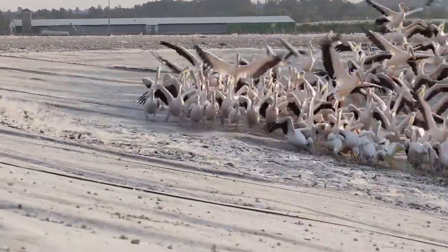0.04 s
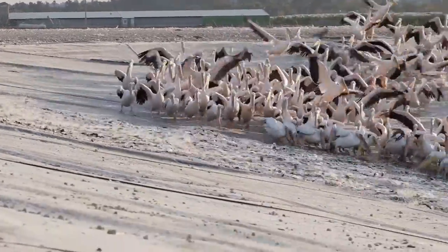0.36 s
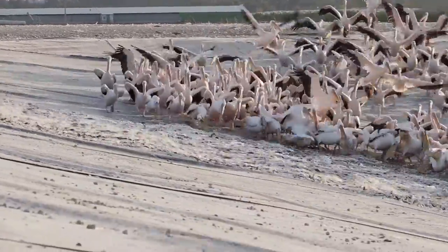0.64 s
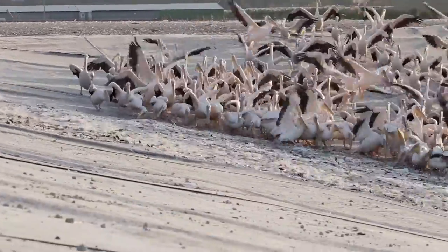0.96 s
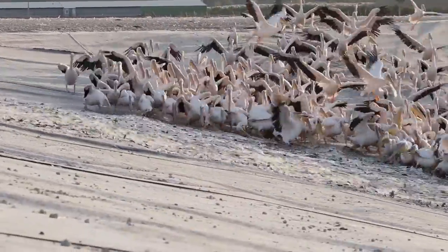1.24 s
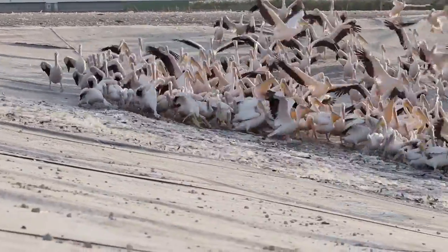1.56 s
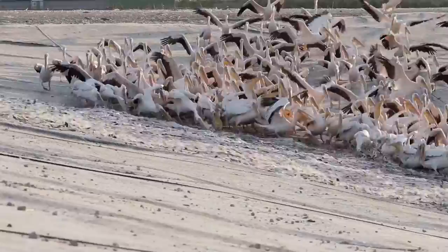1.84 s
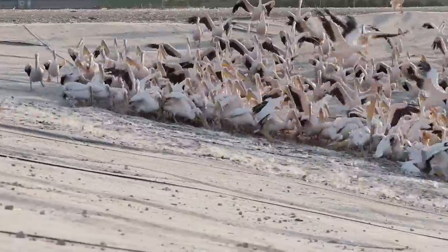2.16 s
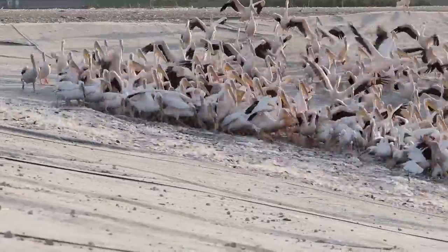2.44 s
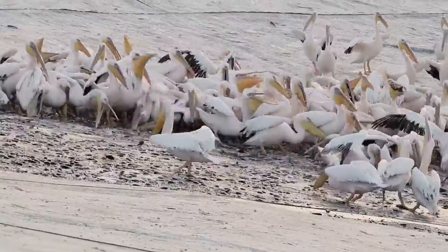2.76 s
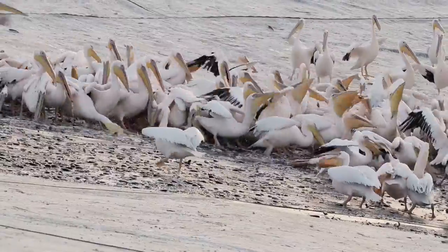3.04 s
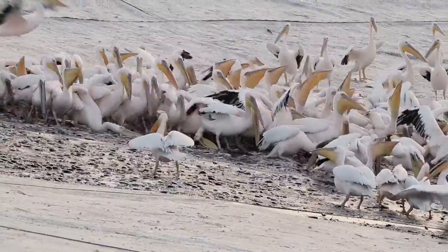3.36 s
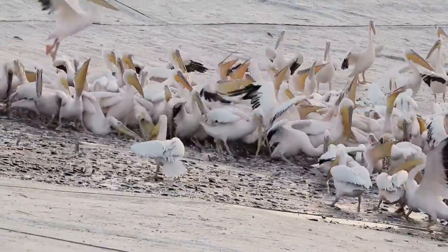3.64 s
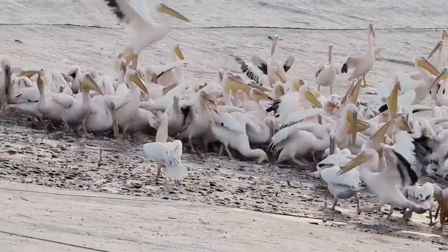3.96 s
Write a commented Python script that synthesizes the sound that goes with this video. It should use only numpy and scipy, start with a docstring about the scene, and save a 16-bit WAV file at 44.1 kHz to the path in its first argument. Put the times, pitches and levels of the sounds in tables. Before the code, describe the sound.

A large flock of pelicans churns shallow water into a dense, splashing rush outdoors, mostly to the right. Nearer wing thumps, spurts of spray and sharp claps stand out, with the loudest clap near 0.85 seconds. At about 2.6 seconds the rush drops abruptly to quieter sloshing, with small splashes, bill snaps and a few wingbeats until 4 seconds. Faint bubbling runs throughout, and there is little bass.

```python
"""Pelicans churning the shallows

A large flock crowds a reservoir bank, mostly to the right. Countless wings and feet churn
the water into a rush; nearer birds stand out with wing thumps, sharp claps and spurts of spray.
The rush gives way abruptly to a quieter group that jostles, sloshes and snaps its bills.
Bubbles ring throughout, and the microphone has a steep low cut."""
import sys
import numpy as np
from scipy import signal
from scipy.fft import rfft, irfft
from scipy.io import wavfile

SR = 44100
rng = np.random.default_rng(int(sys.argv[2]) if len(sys.argv) > 2 else 0)


def store_pcm(level_fs):
    """Save levels as 16-bit WAV."""
    pcm = np.round(np.clip(level_fs, -1, 1) * 32767).astype(np.int16)
    wavfile.write(sys.argv[1], SR, np.atleast_2d(pcm).T)


N = 176400
T = np.arange(N) / SR
HZ = np.maximum(np.arange(N // 2 + 1) * SR / N, 1)

# Levels are relative, ahead of each layer's trim. Pan is left minus right.
# fader ride of the far wingbeats: t/s, level/dB
FAR_WING_RIDE = [(0, -39), (.35, -40.5), (.8, -46.5), (1.1, -41.5), (1.4, -47.5), (1.9, -42.5),
                 (2.2, -45.5), (2.5, -55), (2.7, -54.5), (3.4, -55.5), (3.6, -52), (4, -48.5)]
# their tone: f/Hz, level/dB
FAR_WING_EQ = [(100, 7), (220, 3), (350, 2), (550, 1.5), (900, -40), (2500, -73)]
# their placement: f/Hz, pan/dB
FAR_WING_PAN = [(200, -8), (400, -2.5), (700, 1)]
# trapped bubbles: t/s, level/dB, f/Hz, pan/dB
PLOPS = [(.375, -15, 837, -16), (2.859, -26, 790, 12), (3.207, -27, 4100, -4), (3.292, -23, 1340, 1)]
# single splashes in the quieter group: t/s, level/dB, decay/s, f/Hz, pan/dB
SPLASHES = [(2.608, -32.5, 0.019, 1700, -9), (2.738, -33, 0.025, 2100, -5), (2.847, -28, 0.046, 1620, -11),
            (2.858, -38.5, 0.04, 800, 16), (2.885, -33, 0.016, 1710, -13), (2.931, -29.5, 0.019, 2160, 2),
            (3.199, -25.5, 0.022, 2550, -12), (3.227, -29, .02, 2040, -1), (3.393, -31, 0.053, 2100, -2),
            (3.533, -27.5, 0.013, 1680, -4), (3.566, -27.5, 0.015, 1790, -8), (3.788, -31, 0.037, 1740, -2),
            (3.835, -32, 0.062, 2480, -6), (3.924, -31.5, 0.025, 2020, -3)]
# spurts of spray: t/s, level/dB, decay/s, f/Hz, pan/dB
SPRAYS = [(.15, -23, 0.005, 7740, -3), (0.193, -24.5, .0076, 7900, -17), (0.7775, -19.5, 0.011, 7500, -10),
          (0.808, -24, 0.0092, 7000, -14), (1.296, -15, .0034, 6600, -7), (1.518, -22, 0.013, 7640, -6),
          (1.654, -18, 0.0063, 8200, -3), (1.963, -18, 0.0053, 3980, -5), (2.934, -30, .0048, 4800, 0),
          (3.303, -26, .003, 11500, -8), (3.3951, -32, .0027, 7000, 4), (3.6382, -29, .004, 4200, -4),
          (3.6817, -30.5, .004, 6500, -3), (3.7406, -32, .0045, 9500, -10), (3.806, -28.5, .0027, 6470, 1)]
# near wing thumps: t/s, level/dB, f/Hz, rise/cycles, pan/dB
DOWNSTROKES = [(0.097, -10, 460, 1.25, -34), (0.1632, -19, 400, 0.98, -29), (0.212, -20.5, 360, 1.2, -21),
               (.2674, -14, 560, 0.95, -9), (0.3145, -11.5, 446, 0.34, -21),
               (0.3601, -15.5, 474, 0.82, -23), (.374, -18.5, 318, 1.9, -33), (0.388, -12.5, 400, .8, -21),
               (0.406, -17.5, 436, .6, -25), (0.4778, -8, 543, 0.55, -27), (0.6182, -22.5, 380, 0.86, -19),
               (.655, -17.5, 740, 1.3, -18), (1.05, -23.5, 297, .8, -4), (1.095, -22, 284, 0.97, -6),
               (1.16, -23, 266, 0.95, -7), (1.5455, -8.5, 690, 1.45, 1.5), (1.5997, -10, 560, 0.57, -12),
               (1.601, -12.5, 260, 0.63, -25), (1.6768, -16, 450, .7, -22), (1.864, -20, 444, 0.42, -25),
               (2.0124, -20, 450, 1.1, -32), (2.1495, -18, 327, 0.52, -34), (2.2425, -16, 800, 1.3, -8),
               (3.088, -11.5, 202, 0.64, -14), (3.0914, -28, 394, 1, -12), (3.2177, -24.5, 335, 0.65, 11),
               (3.555, -25, 305, 0.48, -9), (3.5796, -30, 273, 1.5, -7), (3.7983, -29.5, 300, 0.98, -4)]
# papery tone of feathers: f/Hz, level/dB
FEATHER_EQ = [(200, -7), (450, -4.5), (900, 9.5), (1500, -8), (3000, -9), (8000, -41)]
# bills snapping and wings slapping water: t/s, level/dB, f/Hz, pan/dB
CLAPS = [(.147, -11, 1300, -6), (.2532, -11, 1600, -9), (.2934, -5, 1750, -8), (.4272, -15, 1500, -6),
         (.4858, -11, 1950, -9), (.4953, -13, 1950, -8), (.5089, -13, 1500, -14), (.8062, -14, 1600, -6),
         (.8505, 1.5, 1170, -4), (.8652, -13, 1000, -4), (.9855, -9.5, 2350, -6), (1.5452, -10, 1100, -2),
         (1.585, -12, 1300, -6), (1.7016, -12, 1350, -7), (1.848, -10, 2000, -7), (1.8837, -9, 1450, -6),
         (1.9297, -3, 1600, -12), (2.0171, -11, 1200, -2), (2.1398, -14, 1500, -10),
         (2.2421, -10, 1200, -5), (2.423, -12, 1200, -4), (2.5394, -10.5, 1250, -6),
         (2.8483, -21.5, 2100, -2), (2.8586, -17, 1850, -10), (2.8936, -23, 1850, -11),
         (2.934, -20, 1260, 0), (2.9385, -18, 2200, 3), (2.9632, -19, 2750, 0), (3.0416, -15, 2100, 0),
         (3.1987, -23, 2300, -11), (3.2368, -13, 2400, -1), (3.269, -23, 2000, -3), (3.855, -23, 2300, -5),
         (3.3947, -19, 2050, 0), (3.4187, -24, 2400, -4), (3.5402, -27, 1550, 0), (3.8045, -14, 1550, 0)]
# body, mid and treble bands of the water: low/Hz, high/Hz
WATER_BANDS = [(250, 1000), (1000, 4500), (4500, 15800)]
# fader rides of the flock's rush and the quieter slosh: t/s, body/dB, mid/dB, treble/dB
RUSH_RIDE = [(0, -62, -31, -43), (.03, -39.5, -31, -38.5), (.27, -41.5, -29.5, -38.5),
             (.4, -43, -32.5, -40), (.76, -38.5, -29, -39), (.82, -36, -27, -40), (.88, -38.5, -30.5, -40),
             (1.2, -37, -29.5, -37), (1.35, -34, -28.5, -37), (1.53, -35, -27, -37),
             (1.58, -38, -30.5, -39), (1.85, -38, -27.5, -36.5), (2.05, -39, -30, -39),
             (2.3, -37, -28, -38), (2.54, -37, -29.5, -38)]
SLOSH_RIDE = [(2.6, -51.5, -42.5, -47), (2.7, -53.5, -43.5, -47.5), (2.95, -55.5, -40.5, -47.5),
              (3.13, -56, -45, -49.5), (3.32, -58, -42, -46.5), (3.5, -56, -44, -49),
              (3.7, -57.5, -43, -48.5), (3.85, -56, -43, -47.5), (4, -56.5, -41.5, -47.5)]
# their tone: f/Hz, level/dB
RUSH_EQ = [(240, -59), (400, -17.5), (527, -15), (643, -7), (705, -6.5), (738, -4), (1050, -4), (1280, 1.5),
           (1740, -3.5), (2430, -3.5), (2790, -8), (3510, -9), (5000, -17), (7910, -17), (11900, -24.5),
           (15500, -34)]
SLOSH_EQ = [(240, -35), (400, -25), (552, -16), (595, -7), (784, -13), (834, -14), (900, -7.5),
            (1380, -4.5), (2320, -2), (4090, -6), (5000, -16.5), (6580, -13), (8530, -16.5), (12500, -25),
            (15500, -34)]
# their placement: f/Hz, pan/dB
RUSH_PAN = [(400, -0.5), (720, 5.5), (950, -6), (1250, -6), (1600, -2), (2000, -11.5), (3300, -7),
            (5000, -8), (7500, -4), (14000, -8)]
SLOSH_PAN = [(400, 7), (700, 8.5), (1290, 0.5), (2380, -7), (4400, -7), (8100, -5), (15000, -4.5)]
# stereo image of the patter: f/Hz, power share common to both sides (0 wide, 1 mono)
MONO_SHARE = [(200, 0.63), (450, 0.9), (750, 0.39), (1050, 0), (1300, 0.28), (1650, 0.78), (2400, 0.41),
              (3100, 0.24), (4500, 0.3), (5800, 0.01), (9000, 0.05)]

CHANGE_S, CROSSFADE_S = 2.566, 0.0055   # the rush gives way to the slosh
FLOCK_LAG_S, SLOSH_LAG_S = 0.00027, 0.00016   # the left side hears the birds later


def from_db(db):
    """Decibels to gain."""
    return 10 ** (np.asarray(db) / 20)


def rms_one(x):
    """Scale to unit rms."""
    return x / np.sqrt(np.mean(x ** 2) + 1e-20)


def in_time(rows):
    """Each fader of a ride at every sample."""
    times, *columns = np.transpose(rows)
    return [np.interp(T, times, column) for column in columns]


def at_hz(points):
    """A curve at every frequency."""
    hz, value = np.transpose(points)
    return np.interp(np.log(HZ), np.log(hz), value)


def eq(x, gain):
    """Filter by a gain per frequency."""
    return irfft(rfft(x) * gain, N)


def drift(corner_hz):
    """A smooth random wobble of unit rms."""
    return rms_one(eq(rng.standard_normal(N), 1 / (1 + (HZ / corner_hz) ** 2)))


def panned(pan_db):
    """Constant-power left and right gains."""
    ratio = from_db(np.atleast_1d(pan_db))
    return np.array([ratio, np.ones_like(ratio)]) / np.sqrt(1 + ratio * ratio)


def lagged(x, lag_s, knee_hz=2250):
    """Delay the left side, less so in the treble."""
    delay = lag_s / np.hypot(1, HZ / knee_hz)
    return np.array([eq(x[0], np.exp(-2j * np.pi * HZ * delay)), x[1]])


def patter(per_s, spread_db, blur_db):
    """Random impacts over the blur of far ones, partly common to both sides."""
    hits = rng.random(N) < per_s / SR
    sizes = hits * from_db(spread_db * np.minimum(rng.exponential(1, N), 4))
    impacts = rms_one(sizes * rng.choice([-1, 1], (3, N)))
    common, *own = impacts + from_db(blur_db) * rng.standard_normal((3, N))
    mono = np.clip(at_hz(MONO_SHARE), 0, 1)
    return eq(common, np.sqrt(mono)) + eq(np.array(own), np.sqrt(1 - mono))


def far_wings():
    """A soft bed of overlapping wingbeats."""
    beats = lagged(patter(per_s=70, spread_db=3, blur_db=6), FLOCK_LAG_S)
    bed = eq(beats, from_db(at_hz(FAR_WING_EQ)) * panned(at_hz(FAR_WING_PAN)))
    return rms_one(bed) * from_db(in_time(FAR_WING_RIDE)[0])


def bubbles(per_s=130, low_hz=964, high_hz=3880, decay_cycles=10.4, rush_db=-40, slosh_db=-52.5):
    """Small bubbles ring briefly all across the shallows."""
    out, t = np.zeros((2, N + SR)), T[:SR // 25]
    for when, pitch, size, place in rng.random((int(per_s * N / SR), 4)):
        hz = low_hz * (high_hz / low_hz) ** pitch
        start = int(when * N)
        gain = from_db(-3 * min(-np.log(size), 3)) * panned(3 - 14 * place)
        out[:, start:start + len(t)] += gain * np.sin(2 * np.pi * hz * t) * np.exp(-hz * t / decay_cycles)
    return rms_one(lagged(out[:, :N], FLOCK_LAG_S)) * from_db(np.where(T < CHANGE_S, rush_db, slosh_db))


def ring(cycles, decay_cycles):
    """A damped sine, silent until its cycle count passes zero."""
    cycles = np.maximum(cycles, 0)
    return np.sin(2 * np.pi * cycles) * np.exp(-cycles / decay_cycles)


def plops():
    """A scooping bill traps a large bubble, which rings briefly."""
    out = 0
    for at, db, hz, pan in PLOPS:
        cycles = np.minimum((T - at) * hz, 100)
        out += panned(pan) * from_db(db) * ring(cycles, decay_cycles=5.4)
    return lagged(out, SLOSH_LAG_S)


def splashes(trim_db=-1.5, attack_s=0.001, q=1.3, hiss_db=-32):
    """A bill or wing breaks the water: a quick burst of drops that dies away."""
    drops = rfft(lagged(patter(per_s=670, spread_db=3, blur_db=-4.5), SLOSH_LAG_S))
    hiss = from_db(hiss_db) / (1 + (HZ / 9000) ** 4)
    out = 0
    for at, db, decay, hz, pan in SPLASHES:
        band = 1 / (1 + q ** 2 * (HZ / hz - hz / HZ) ** 2)
        burst = rms_one(irfft(drops * (band + hiss), N))
        envelope = np.clip((T - at) / attack_s, 0, 1) * np.exp(-np.clip((T - at) / decay, 0, 20))
        out += panned(pan) * from_db(db + trim_db) * envelope * burst
    return out


def spray(trim_db=-3, q=2.3, air_hz=13400):
    """Wet spurts of fine droplets, each with its own brightness; the air dulls their top end."""
    drops = rfft(patter(per_s=4000, spread_db=6, blur_db=-16))
    air = 1 / (1 + (HZ / air_hz) ** 6)
    out = 0
    for at, db, decay, hz, pan in SPRAYS:
        band = 1 / np.hypot(1, q * (HZ / hz - hz / HZ))
        hiss = rms_one(irfft(drops * band * air, N))
        slope_s = np.where(T < at, decay / 2, decay)
        envelope = np.exp(-np.minimum(abs(T - at) / slope_s, 20))
        out += panned(pan) * from_db(db + trim_db) * envelope * hiss
    return out


def near_wings(trim_db=-2.5, fall_share=0.66, feather_db=-10.5, feather_s=0.0084):
    """Each downstroke pushes a short thump of air, wrapped in a papery flutter of feathers."""
    out = np.zeros((2, N))
    feathers = rms_one(eq(rng.standard_normal(N), from_db(at_hz(FEATHER_EQ))))
    for at, db, hz, rise_cycles, pan in DOWNSTROKES:
        near = abs(T - at) < 0.04
        t = T[near] - at
        width_s = rise_cycles / hz * np.where(t < 0, 1, fall_share)
        thump = np.exp(-0.5 * (t / width_s) ** 2) * np.sin(2 * np.pi * hz * t)
        feather_gain = from_db(feather_db) * min(hz / 450, 1) ** 2   # deep strokes rustle less
        flutter = feather_gain * feathers[near] * np.exp(-abs(t) / feather_s)
        out[:, near] += panned(pan) * from_db(db + trim_db) * (thump + flutter)
    return lagged(out, lag_s=0.00036)


def claps(trim_db=2, lag_s=0.00012, crack_hz=2300, rebound_db=-6, drops_db=-29, drops_s=0.009):
    """Bill snaps and wing slaps: a damped knock with a crack, a rebound and a tail of drops."""
    out, t = np.zeros((2, N + SR)), T[:SR // 20]
    for at, db, hz, pan in CLAPS:
        left_lag = lag_s * np.tanh(max(-pan, 0) / 4)   # claps on the right reach the left later
        age = t - np.array([[left_lag], [0]])
        knock = ring(hz * age, decay_cycles=0.75)
        rebound = from_db(rebound_db) * ring(hz * age - 2.25, decay_cycles=0.75)
        crack_gain = from_db(-2) * max(1 - hz / crack_hz, 0)   # bigger, deeper claps crack harder
        crack = crack_gain * ring(crack_hz * age, decay_cycles=2)
        drops = from_db(drops_db) * rng.standard_normal((2, len(t))) * np.exp(-t / drops_s)
        tail = signal.fftconvolve(drops, knock, axes=1)[:, :len(t)] / np.linalg.norm(knock[1])
        start = int(at * SR)
        out[:, start:start + len(t)] += panned(pan) * from_db(db + trim_db) * (knock + crack + rebound + tail)
    return eq(out[:, :N], 1 / (1 + (700 / HZ) ** 6))


def churn(grains, ride, colour, pan, trims_db, flicker_db, flicker_hz, patch_db, low_cut_hz):
    """A wash of splashes in three bands, flickering together and in roughly half-octave patches."""
    tone = from_db(at_hz(colour)) / np.sqrt(1 + (low_cut_hz / HZ) ** 6)
    spectrum = rfft(grains) * tone * panned(at_hz(pan))
    flicker = from_db(flicker_db * drift(flicker_hz))
    out = 0
    for (low, high), level, trim in zip(WATER_BANDS, in_time(ride), trims_db):
        edges = np.geomspace(low, high, int(2 * np.log2(high / low)) + 2)
        band = 0
        for bottom, top in zip(edges, edges[1:]):
            patch = irfft(spectrum * (HZ >= bottom) * (HZ < top), N)
            band += patch * from_db(patch_db * drift(flicker_hz))
        out += rms_one(band * flicker) * from_db(level + trim)
    return out


def water():
    """Wings and feet churn the shallows: the whole flock's rush, then the quieter group's slosh."""
    dense = lagged(patter(per_s=2200, spread_db=2.5, blur_db=5), FLOCK_LAG_S)
    rush = churn(dense, RUSH_RIDE, RUSH_EQ, RUSH_PAN, trims_db=[4, 3.8, 3.1],
                 flicker_db=0.5, flicker_hz=20, patch_db=1.1, low_cut_hz=544)
    sparse = lagged(patter(per_s=1100, spread_db=1.5, blur_db=3), SLOSH_LAG_S)
    slosh = churn(sparse, SLOSH_RIDE, SLOSH_EQ, SLOSH_PAN, trims_db=[3, 4, 4.5],
                  flicker_db=-1.3, flicker_hz=23, patch_db=0.44, low_cut_hz=640)
    crossfade = np.clip((T - CHANGE_S) / CROSSFADE_S + 0.5, 0, 1)
    return rush * (1 - crossfade) + slosh * crossfade


def scene():
    """Water, wings and bills in the open air."""
    return water() + splashes() + plops() + bubbles() + far_wings() + near_wings() + claps() + spray()


def record(dry):
    """The microphone's steep low cut leaks a trace of bass; the very top is cut off."""
    low_cut_hz, leak_db, top_hz = 198.6, -38, 15800
    low_cut = 1 / np.sqrt(1 + (low_cut_hz / HZ) ** 48)
    high_cut = np.clip((top_hz - HZ) / 100, 0, 1)
    return eq(dry, (low_cut + from_db(leak_db)) * high_cut)


dry = scene()
out = record(dry)
store_pcm(out)
```